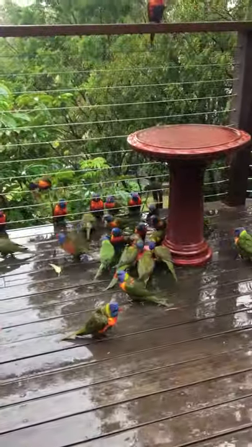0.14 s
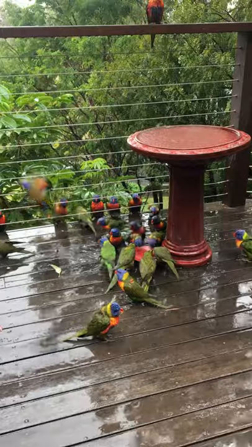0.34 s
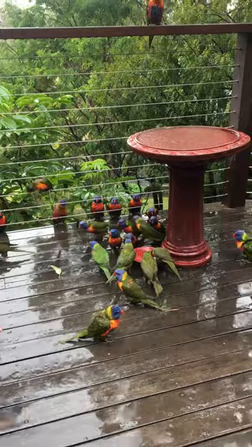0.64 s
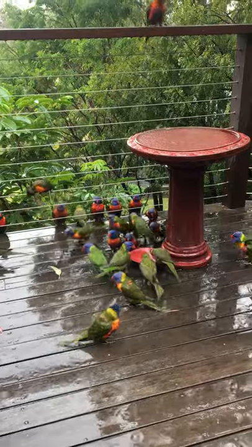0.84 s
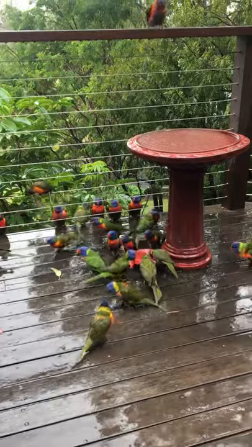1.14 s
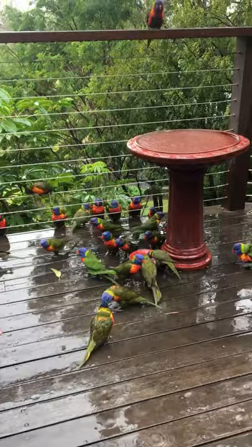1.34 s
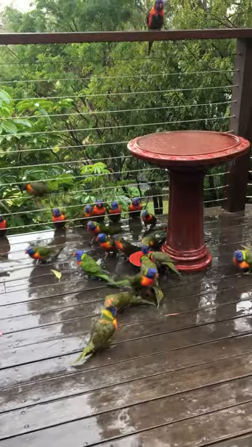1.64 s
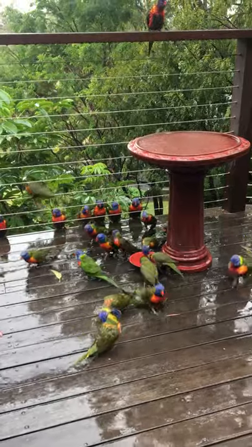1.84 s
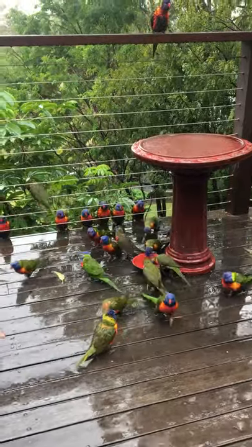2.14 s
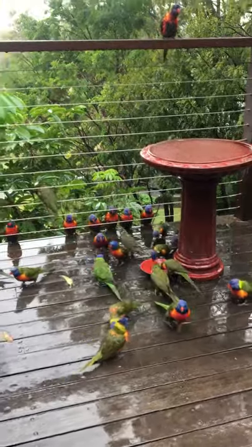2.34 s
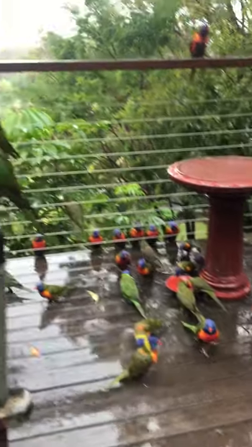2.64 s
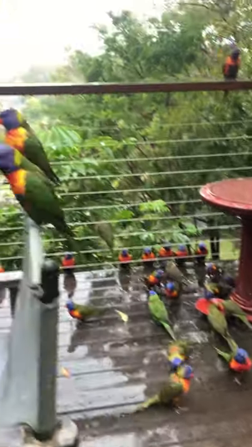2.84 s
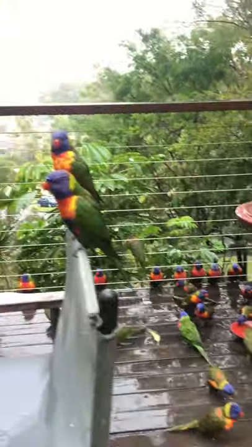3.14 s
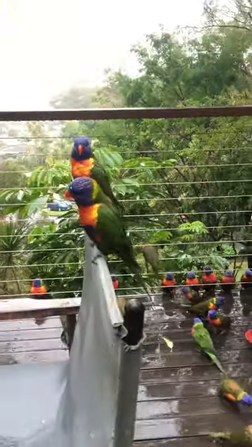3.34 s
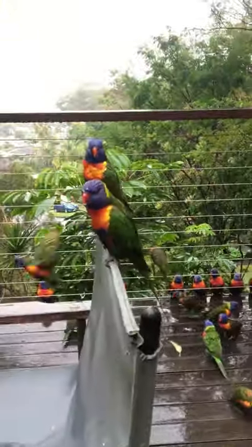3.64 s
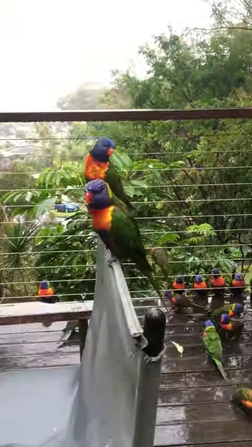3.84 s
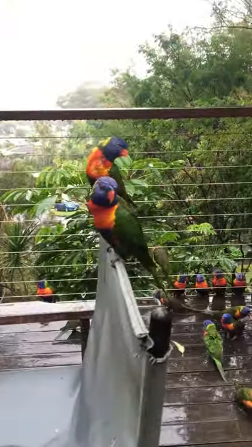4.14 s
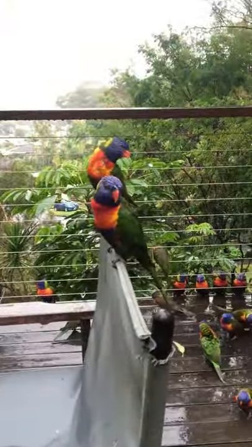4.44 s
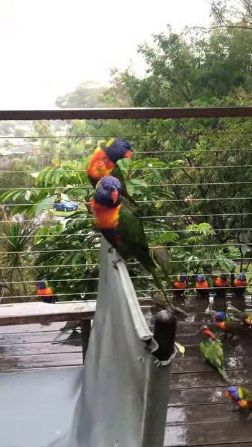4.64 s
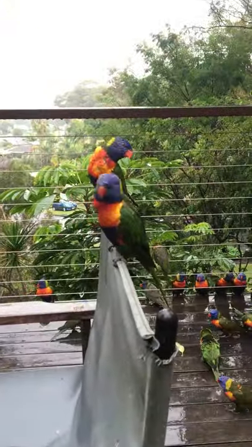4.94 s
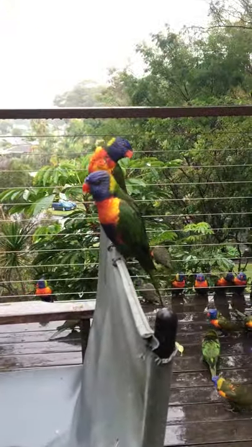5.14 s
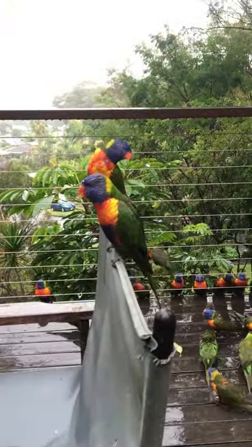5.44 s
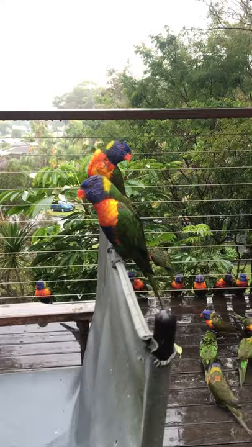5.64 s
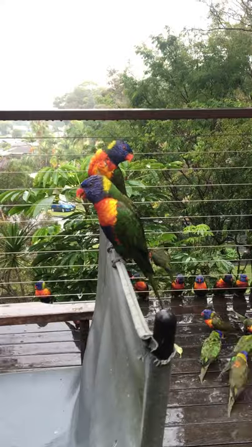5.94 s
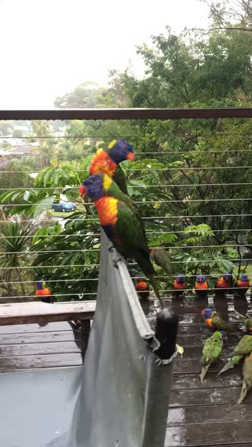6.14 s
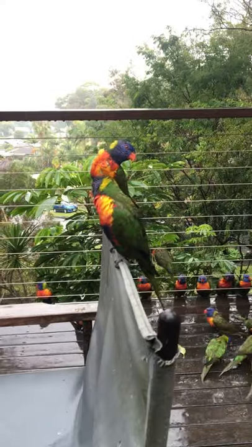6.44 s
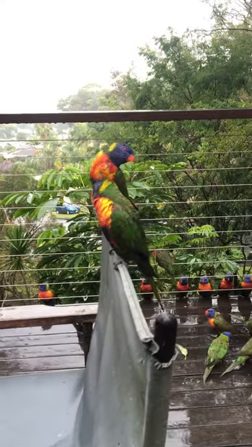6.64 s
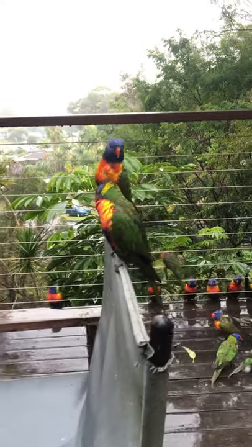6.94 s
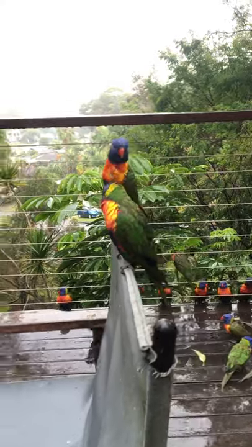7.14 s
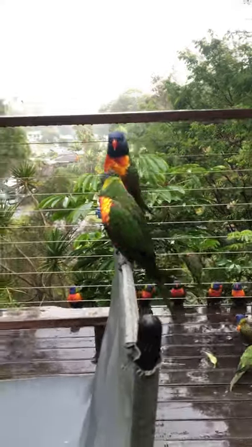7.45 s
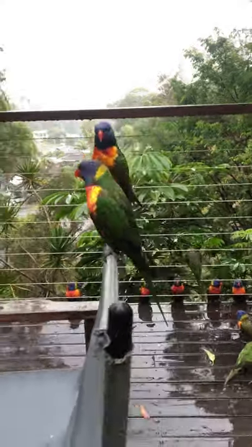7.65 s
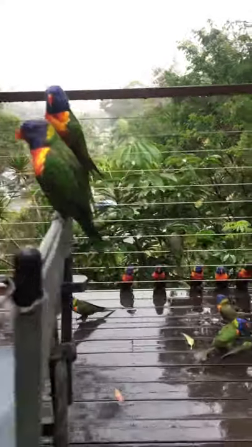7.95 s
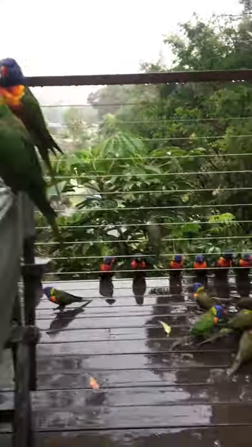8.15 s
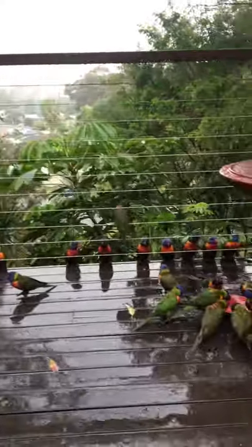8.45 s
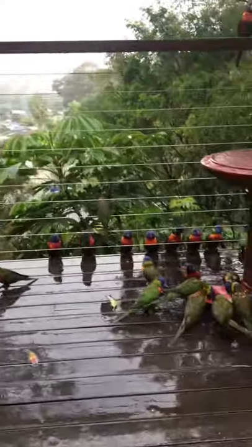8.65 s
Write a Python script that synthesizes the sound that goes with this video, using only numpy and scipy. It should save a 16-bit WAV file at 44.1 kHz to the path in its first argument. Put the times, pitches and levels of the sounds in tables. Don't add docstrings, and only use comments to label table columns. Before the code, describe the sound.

Rainbow-coloured parrots squeak, yodel and rasp in quick volleys on a wet deck, then quieten to faint murmurs amid light rain and drips.

```python
import sys
import numpy as np
from scipy import signal
from scipy.io import wavfile
from scipy.ndimage import uniform_filter1d

SR = 44100
rng = np.random.default_rng(int(sys.argv[2]) if len(sys.argv) > 2 else 0)


def natural_amplitude(level_db):
    exponent = np.asarray(level_db, float) / 20
    return 10 ** exponent


def materialize(psi):
    bounded = np.clip(np.atleast_2d(psi).T, -1, 1)
    quanta = np.round(bounded * 32767).astype(np.int16)
    wavfile.write(sys.argv[1], SR, quanta)


N = 387638

# start_s (within the motif), start_hz, end_hz, level_db,
# bright_db (upper over lower overtones)
CLIMB_MOTIF = [
    (0, 2069, 2208, -4.5, -15),
    (.046, 2687, 2813, 0.5, -4),
    (.073, 2574, 2750, 3.5, 4.5),
    (0.101, 2877, 2984, 2.5, -7),
    (0.137, 3103, 3288, 4.5, 10),
    (.161, 3270, 3005, 4.7, -6.5),
    (.185, 2977, 3247, 3.5, -10),
    (0.221, 3270, 3330, 4, -3.5),
]
# start_s, stretch_ratio, pitch_ratio, level_db, fade_db
CLIMBS = [
    (1.766, 0.93, 1.008, -15.5, -2),
    (3.255, 1.02, .998, -14.5, -12.5),
    (7.544, .99, .998, -16.5, -2.5),
]
# (start_s, pitch_hz, level_db)
YODELS = [
    (0.481, 0.088, 0.066, -9, [(.343, 2950, -17), (.368, 3400, -27), (.383, 2830, -12), (.391, 3701, -12.5), (.411, 2710, -11), (.436, 3719, -9.5), (.452, 2914, -8)]),
    (2.167, 0.0057, 0.0039, -9.5, [(2.01, 3980, -14), (2.044, 3870, -4.5), (2.061, 2847, -5.5), (2.097, 3700, -6.5), (2.122, 2780, -7.5), (2.14, 3730, -7), (2.158, 2760, -6)]),
    (2.432, .069, 0.0943, -18, [(2.3, 2960, -12.5), (2.32, 3690, -4), (2.336, 2902, -7), (2.367, 3870, -10.5), (2.392, 2812, -7), (2.417, 3124, -20)]),
]
# (start_s, start_hz, end_hz, level_db)
BREATHS = [(0.1212, -21, [(.062, 2149, 2380, -31), (.097, 3480, 3430, -13.5)]),
           (.175, 7.5, [(.12, 2550, 2516, -17.5)]), (.097, 0.5, [(.056, 4780, 4617, -30),
           (.068, 4350, 4260, -27), (.081, 4850, 4660, -30.5)]), (0.3, -7.5, [(.172, 2990, 3270, -9.5),
           (.184, 2897, 2937, -15.5), (.268, 2980, 2664, -18.5)]), (.119, -23.5, [(.001, 1338, 1517, -33),
           (.062, 1574, 1360, -31.5)]), (.29, -4, [(.19, 1380, 1409, -26), (.255, 1450, 1580, -30.5)]),
           (1.564, -36, [(1.515, 1680, 1940, -36)]), (1.603, -8.5, [(1.535, 2106, 2310, -31),
           (1.56, 2600, 2770, -26)]), (1.672, -12.5, [(1.606, 2430, 3002, -21), (1.64, 2970, 3450, -21)]),
           (1.705, -18, [(1.674, 3500, 2690, -19.5)]), (1.758, -25, [(1.715, 2534, 2402, -28)]),
           (1.95, -3, [(1.845, 1490, 1627, -22.5), (1.876, 1115, 1094, -15.5), (1.899, 1530, 1480, -19.5)]),
    (2.048, -8.5, [(1.95, 3044, 2679, -9.5), (1.976, 2890, 2945, -13.5), (2.005, 3049, 2700, -7)]),
    (2.033, -9.5, [(1.99, 1616, 1383, -11.5)]),
    (2.297, -7.5, [(2.24, 3025, 2630, -14.5), (2.265, 4200, 4520, -17), (2.286, 4500, 4080, -18)]),
    (2.404, -2.5, [(2.16, 1817, 1935, -27), (2.203, 2270, 2437, -28), (2.242, 2127, 1907, -20), (2.265, 1810, 1800, -25.5), (2.309, 2150, 2186, -23), (2.365, 1870, 1670, -17.5), (2.378, 2150, 1730, -22)]),
           (3.074, -5.5, [(3.022, 1583, 1780, -26.5), (3.039, 3200, 3877, -9), (3.062, 3547, 3820, -18.5)]),
    (3.149, -48, [(3.075, 3260, 3440, -16), (3.085, 3020, 3250, -14), (3.099, 2860, 2995, -17)]),
    (3.228, -17.5, [(3.148, 3830, 4380, -22), (3.158, 4320, 3600, -17.5), (3.174, 2991, 3102, -10.5), (3.206, 3800, 4265, -15)]),
    (3.315, -8, [(3.245, 3460, 3650, -18), (3.265, 3669, 2956, -15.5)]),
    (3.164, -4, [(3.075, 1504, 1583, -32.5)]),
    (3.259, -24.5, [(3.235, 1175, 1209, -32.5)]),
    (4.115, -3.5, [(3.952, 904, 980, -32.5), (3.972, 990, 858, -30.5), (3.999, 1034, 898, -26), (4.036, 897, 1063, -23.5), (4.093, 1054, 924, -28.5)]),
           (4.499, -4, [(4.244, 1193, 1366, -30.5), (4.263, 2076, 2360, -22), (4.279, 2787, 2853, -13), (4.304, 4040, 4218, -12.5), (4.315, 4170, 4020, -13.5), (4.326, 3210, 3469, -14.5), (4.337, 2615, 2544, -14), (4.361, 3540, 3570, -22), (4.375, 3346, 3290, -14), (4.425, 3300, 3116, -13.5), (4.468, 3160, 3010, -17)]),
    (4.536, -6, [(4.503, 3800, 3500, -28)]),
    (4.879, -14, [(4.763, 1318, 942, -38.5), (4.795, 1235, 1254, -37.5), (4.835, 1600, 1595, -31)]),
    (5.094, -11, [(4.888, 3850, 4000, -27.5), (4.908, 2940, 3365, -30), (4.929, 2800, 2890, -29), (4.948, 3592, 4670, -25), (4.976, 4598, 4380, -28.5), (5.023, 3750, 3330, -21), (5.06, 3180, 2950, -31.5)]),
           (5.42, -6, [(5.162, 1135, 1163, -28), (5.182, 1750, 1682, -8), (5.21, 3716, 3937, -2.5), (5.221, 4685, 4380, 0), (5.235, 1124, 1205, -13.5), (5.245, 3524, 3320, 0), (5.258, 4205, 4200, -3), (5.277, 3310, 3753, -2), (5.301, 4580, 4516, -1), (5.345, 3356, 3514, -5.5), (5.375, 3440, 3136, -6)]),
    (5.461, -11, [(5.414, 3100, 2830, -16.5)]),
    (5.228, 5, [(5.19, 2090, 2145, -19)]),
    (5.391, -3, [(5.295, 2806, 2610, -16), (5.327, 2910, 2990, -20)]),
    (5.994, -40, [(5.975, 1670, 2090, -37)]),
           (7.058, -19, [(7.001, 2039, 2273, -31), (7.047, 945, 956, -27)]),
    (7.219, -2, [(7.072, 1937, 1960, -30.5), (7.106, 2285, 1867, -32.5), (7.122, 2250, 2647, -24), (7.149, 2727, 2868, -16.5)]),
    (7.503, -38, [(7.477, 1416, 980, -37.5)]),
    (7.543, -14, [(7.522, 1095, 1218, -29)]),
    (7.605, -30.5, [(7.555, 1620, 1648, -28)]),
    (7.59, -8.5, [(7.538, 3150, 3270, -25.5)]),
    (7.652, -39, [(7.596, 3600, 4256, -22.5), (7.622, 4270, 3300, -16)]),
    (7.797, -11, [(7.656, 3600, 4496, -18), (7.69, 4500, 4480, -16.5), (7.722, 3382, 3380, -17), (7.76, 3200, 2872, -34.5)]),
    (8.381, -18, [(8.36, 1389, 1230, -39)]),
    (8.472, -7, [(8.405, 1440, 1513, -30.5)]),
]
# start_s, length_s, pitch_hz, level_db, trill_hz, wildness (0-1)
RASPS = [(0, 0.1, 1063, -28.5, 68.8, 0.71), (.29, 0.11, 988, -18, 80.4, 0.67),
         (1.549, 0.2305, 1361, -29, 55.2, 0.31), (1.818, 0.21, 1890, -21.5, 70, 0.96),
         (2.282, 0.037, 1660, -18, 90.3, 0.94), (3.055, 0.041, 1504, -18, 106, 1),
         (5.458, 0.087, 2720, -21, 79.1, 0.32), (5.593, 0.097, 2356, -20, 105.7, 0.41),
         (0.299, .1, 2720, -20, 72.5, 0.5), (5.423, 0.14, 1017, -25, 123.1, 0.51),
         (5.592, 0.096, 1113, -19, 104, 0.8), (5.982, 0.19, 1418, -25, 157.5, 0.12),
         (8.063, 0.069, 2292, -35, 130, 0.45), (8.369, 0.046, 2690, -33, 145, 0.94)]
# start_s, peak_db, pitch_hz
CLUCKS = [
    (1.1205, -32, 3210),
    (1.143, -27, 3110),
    (1.1636, -31, 1872),
    (1.204, -34, 1820),
    (1.4786, -29, 3200),
]
# frequency_hz, gain_db
THROAT = [(900, -4.5), (2000, 4), (3500, 7), (5500, -6), (8200, -17.5), (10000, -17), (15000, -29)]
# pitch_hz, bright_db
REGISTER = [(1100, -1.5), (1700, 3), (2250, -18), (2560, 11), (2800, -1), (3250, -1), (3600, -3.5),
            (4600, -9)]
# frequency_hz, level_db (per hertz)
RAIN = [(30, -61.5), (55, -0.5), (110, -4), (300, -9.5), (700, -14), (2100, -15), (3300, -21), (15500, -35)]
# time_s, gain_db
GUSTS = [
    (0, 0.5),
    (1.1, 2.5),
    (1.8, -5.5),
    (3.8, 3),
    (5.4, -5),
    (6, 2.5),
    (7, -2),
]
# time_s, level_db
MOTOR = [
    (4.8, -56.5),
    (7.4, -53.5),
    (8.8, -71),
]


def read(points, at):
    x, value = np.transpose(points)
    return np.interp(at, x, value)


def evened(x):
    return x / np.sqrt(np.mean(x ** 2) + 1e-20)


def add(mix, start_s, sound):
    part = mix[round(start_s * SR):][:len(sound)]
    part += sound[:len(part)]


def wander(count, size):
    noise = uniform_filter1d(rng.standard_normal(count), size)
    return evened(uniform_filter1d(noise, size))


def joined(starts, end_s):
    return np.diff(np.append(starts, end_s))


def syrinx(hz, level_db, bright_db):
    count = len(hz)
    k = np.arange(1, 15500 // hz.mean() + 2)[:, None]
    shimmer_db = [3.1 * wander(count // 16 + 1, size=22).repeat(16)[:count] for _ in k]
    gain_db = read(THROAT, k * hz) - 2.15 * np.log2(k) + uniform_filter1d(shimmer_db, size=16)
    gain = natural_amplitude(gain_db) * (k * hz < 16000)
    upper = np.clip((k * hz - 4900) / 300 + .5, 0, 1)
    low, high = gain * (1 - upper), gain * upper
    low = low / np.linalg.norm(low, axis=0)
    high = high / np.linalg.norm(high, axis=0)
    gain = low + natural_amplitude(bright_db) * high
    gain = gain / np.linalg.norm(gain, axis=0)
    tone = np.cos(2 * np.pi * (k * np.cumsum(hz) / SR + rng.random(k.shape)))
    return natural_amplitude(level_db) * np.sqrt(2) * (gain * tone).sum(0)


def phrase(notes):
    s, length, start_hz, end_hz, level_db, bright_db = np.transpose(notes)
    t = np.arange(s[0], s[-1] + length[-1], 1 / SR)
    k = np.searchsorted(s, t, "right") - 1
    u = np.clip((t - s[k]) / length[k], 0, 1)
    glide = (end_hz - start_hz)[k]
    ease = 1.6
    hz = start_hz[k] + glide * np.where(glide > 0, 1 - (1 - u) ** ease, u ** ease)
    hz = uniform_filter1d(uniform_filter1d(hz, size=80), size=80)
    inner = np.ravel([s + 0.28 * length, s + 0.69 * length], "F")
    level_db = np.interp(t, inner, np.repeat(level_db, 2))
    bright_db = np.interp(t, inner, np.repeat(bright_db, 2))
    hoarse = np.clip((2400 - hz) / 1400, 0, 1)
    snap = np.clip(abs(np.gradient(np.log(hz))) * 400, 0, 1)
    jitter = (.003 + .012 * hoarse) * wander(len(t), size=90)
    hz = hz * (1 + jitter + .03 * snap * wander(len(t), size=20))
    flutter = 1 + (0.12 + 0.18 * hoarse) * wander(len(t), size=100)
    flutter = flutter + 0.02 * rng.standard_normal(len(t))
    fade = np.clip(np.minimum(t - t[0], t[-1] - t) / 0.0033, 0, 1)
    return s[0], syrinx(hz, level_db - 5 * snap, bright_db) * flutter * fade


def climb(start_s, stretch, ratio, level_db, fade_db):
    motif_s = 0.25
    at, start_hz, end_hz, db, bright_db = np.transpose(CLIMB_MOTIF)
    faded_db = level_db + db + fade_db * at / motif_s
    return np.transpose([start_s + stretch * at, stretch * joined(at, motif_s),
                         ratio * start_hz, ratio * end_hz, faded_db, bright_db])


def yodel(whistle_s, hold_s, sag_s, level_db, flips):
    s, hz, db = np.transpose(flips)
    high = hz > 3300
    glide = np.where(high, 0.95, 1.03)
    beak_db = np.where(high, -21, -6)
    notes = np.transpose([s, joined(s, whistle_s), hz, hz * glide, db, beak_db])
    hold_hz, sag_hz, hold_beak_db = 2910, 2644, -18.5
    hold = (whistle_s, hold_s, hold_hz, hold_hz, level_db, hold_beak_db)
    sag = (whistle_s + hold_s, sag_s, hold_hz, sag_hz, level_db - 8.5, hold_beak_db)
    return np.vstack([notes, hold, sag])


def breath(end_s, beak_db, notes):
    s, start_hz, end_hz, db = np.transpose(notes)
    bright_db = beak_db + read(REGISTER, (start_hz + end_hz) / 2)
    return np.transpose([s, joined(s, end_s), start_hz, end_hz, db, bright_db])


def rasp(start_s, length_s, pitch_hz, level_db, trill_hz, wild):
    count = round(length_s * SR)
    beat = np.cumsum(trill_hz * (1 + .3 * wild * wander(count, size=600))) / SR % 1
    sweep = .22 * (1 - wild) * uniform_filter1d(beat - .5, size=40)
    tremble = .11 * wild * wander(count, size=100)
    puffs = (1 - .75 * np.cos(np.pi * beat) ** 2) * natural_amplitude(4 * wild * wander(count, size=70))
    rise = np.linspace(.5, 1, count)
    hz = pitch_hz * (1 + sweep + tremble + (rise - .75) * (1 - wild) / 6)
    voice = syrinx(hz, 0, 8 * wild - 8)
    thin = signal.lfilter(*signal.butter(2, 2200, "high", fs=SR), voice)
    voice = thin + (1 - 0.553 * wild) ** 2 * (voice - thin)
    return start_s, evened(voice * puffs) * rise * signal.windows.tukey(count, .2) * natural_amplitude(level_db)


def cluck(start_s, peak_db, pitch_hz):
    hz = pitch_hz / 2 * (1 + 0.053 * wander(400, size=40))
    return start_s, syrinx(hz, peak_db - 6.5, -13.5) * np.hanning(len(hz))


def twitter(count=7):
    start_s, cycle_s, low_s = 3.575, .0485, 0.034
    k = np.arange(-1, 2 * count)
    high, done = k % 2, k / (2 * count)
    s = start_s + k // 2 * cycle_s + high * low_s
    hz = (1830 - 402 * done * abs(done) ** .5) * 1.12 ** high
    level_db = -34 - 10.5 * done - 3 * high
    notes = np.transpose([s, joined(s, s[-1] + low_s / 2), hz, hz, level_db, -4 + 0 * k])
    first_s, voice = phrase(notes)
    return first_s, signal.lfilter(*signal.butter(1, 2230, fs=SR), voice)


def flock():
    mix = np.zeros(N)
    chatter = BREATHS
    breaths = [climb(*c) for c in CLIMBS] + [yodel(*y) for y in YODELS] + [breath(*b) for b in chatter]
    for notes in breaths:
        add(mix, *phrase(notes))
    for row in RASPS:
        add(mix, *rasp(*row))
    for row in CLUCKS:
        add(mix, *cluck(*row))
    add(mix, *twitter())
    return mix


def balcony(x):
    at = np.arange(100, SR, 20)
    at = at + rng.integers(0, 20, len(at))
    near = natural_amplitude(-60 * at / SR / 0.14)
    trees = natural_amplitude(-20.5 - 60 * at / SR / 0.91)
    taps = np.zeros(SR + 20)
    taps[at] = rng.choice([-1., 1.], len(at)) * (near + trees)
    taps = signal.lfilter([1], [1, -.4], taps)
    return natural_amplitude(-12.5) * signal.fftconvolve(x, taps / np.linalg.norm(taps))[:N]


def rain_and_gusts():
    frames, hz = N // 256 + 5, np.fft.rfftfreq(1024, 1 / SR)
    a, b, patches = rng.standard_normal((frames, 513, 3)).T
    patches = evened(uniform_filter1d(uniform_filter1d(patches, size=12, axis=0), size=10, axis=1))
    patch_db = 2.26 * patches * (hz / (hz + 600))[:, None]
    gust_db = read(GUSTS, np.arange(frames) * 256 / SR) / (1 + (hz[:, None] / 1200) ** 2)
    colour_hz, colour_db = np.transpose(RAIN)
    colour_db = np.interp(np.log(hz + 1), np.log(colour_hz), colour_db)
    z = (a + 1j * b) * natural_amplitude(colour_db[:, None] + patch_db)
    calm = signal.istft(z, nperseg=1024, noverlap=768)[1]
    gusty = signal.istft(z * natural_amplitude(gust_db), nperseg=1024, noverlap=768)[1][:N]
    return natural_amplitude(-44.5) / np.std(calm) * gusty


def drops():
    level_db = -43.0 + 2.57 * rng.exponential(1, N + 1)
    hits = np.diff(natural_amplitude(level_db) * (rng.random(N + 1) < 40 / SR))
    return signal.lfilter([1], [1, -.6, .5], hits)


def motor():
    hum = np.sin(2 * np.pi * np.cumsum(656 + 3 * wander(N, size=4000)) / SR)
    return natural_amplitude(read(MOTOR, np.arange(N) / SR)) * hum


def scene():
    birds = flock()
    return (birds + balcony(birds) + rain_and_gusts() + drops() + motor())[None]


def top_cut(x):
    return signal.sosfilt(signal.butter(12, 15750, fs=SR, output="sos"), x)


def record(dry):
    power_db = 10 * np.log10(abs(uniform_filter1d(dry[0] ** 2, size=2000)) + 1e-12)
    fall = np.arange(N) * 35.4 / SR
    held_db = np.maximum.accumulate(power_db + fall) - fall
    over_db = np.maximum(held_db + 25, 0)
    ducked = dry * natural_amplitude(-.25 * uniform_filter1d(over_db, size=2000))
    soft = ducked / (1 + abs(ducked) ** 8) ** (1 / 8)
    low_cut = signal.butter(2, 45, "high", fs=SR, output="sos")
    return top_cut(signal.sosfilt(low_cut, soft))


dry = scene()
out = record(dry)
materialize(out)
```